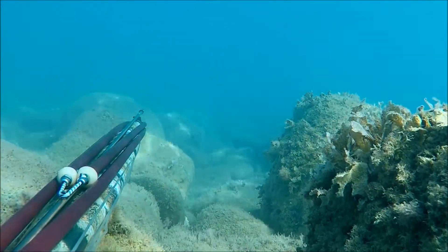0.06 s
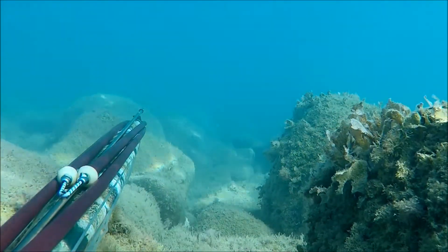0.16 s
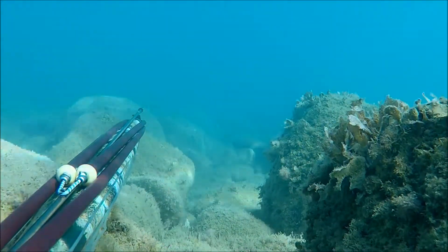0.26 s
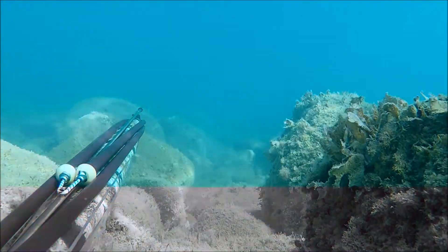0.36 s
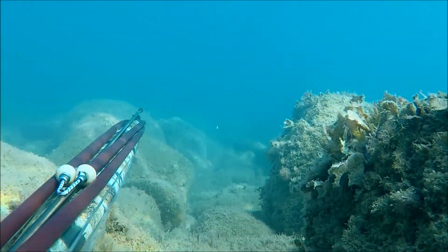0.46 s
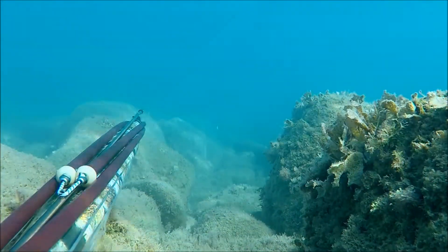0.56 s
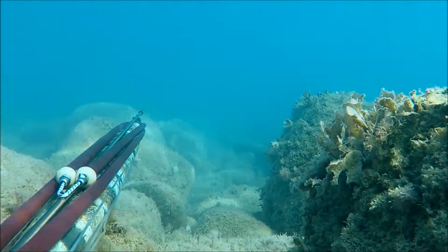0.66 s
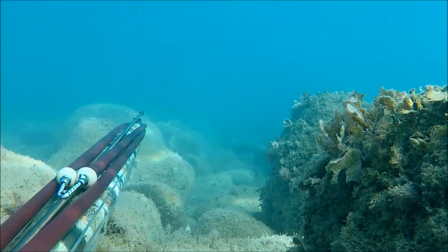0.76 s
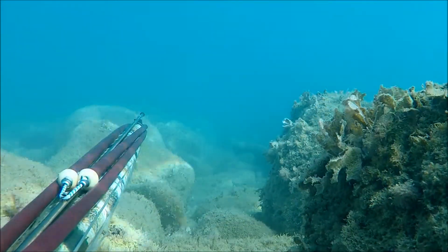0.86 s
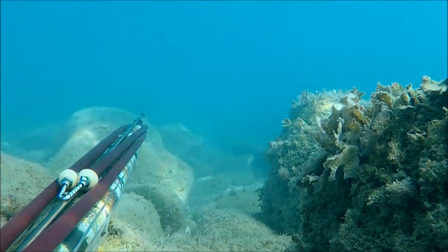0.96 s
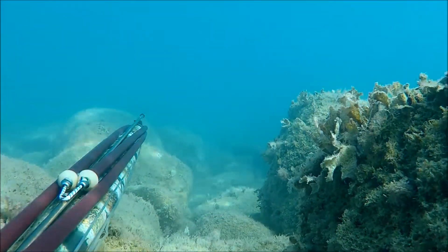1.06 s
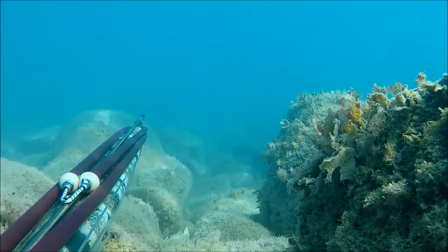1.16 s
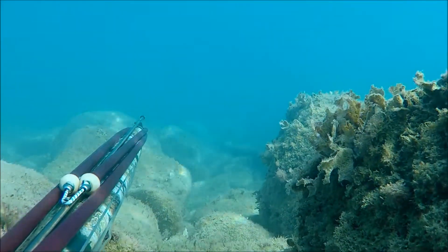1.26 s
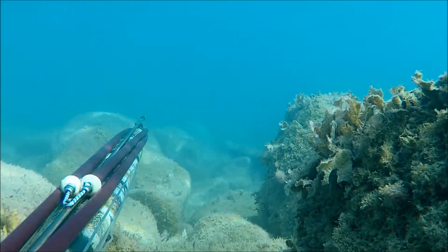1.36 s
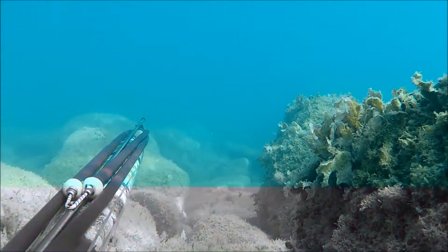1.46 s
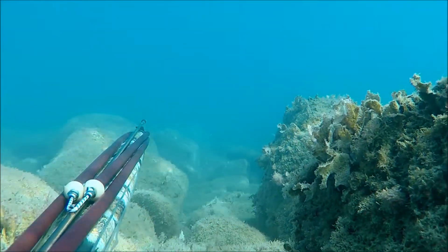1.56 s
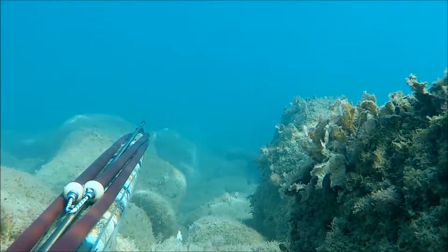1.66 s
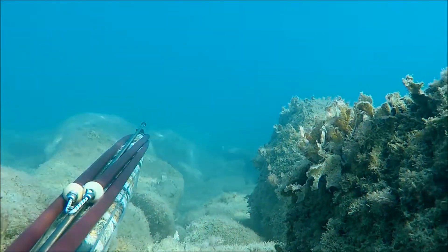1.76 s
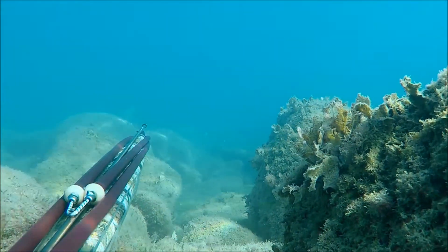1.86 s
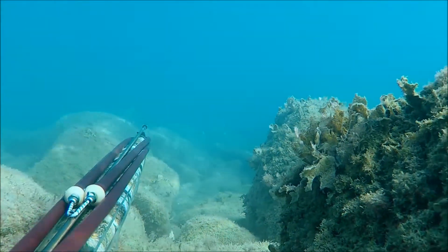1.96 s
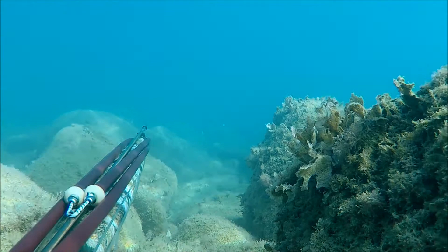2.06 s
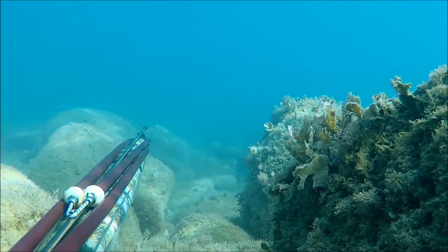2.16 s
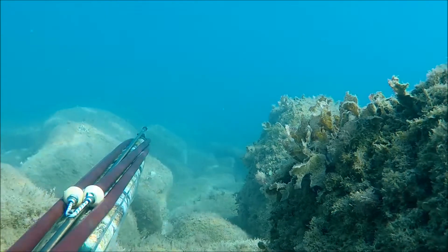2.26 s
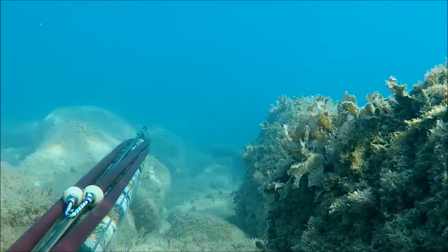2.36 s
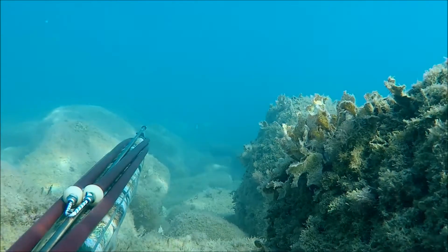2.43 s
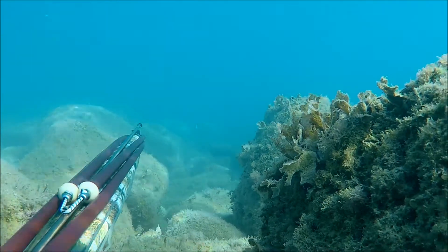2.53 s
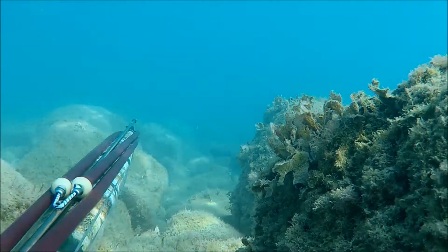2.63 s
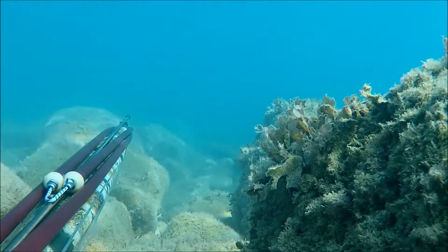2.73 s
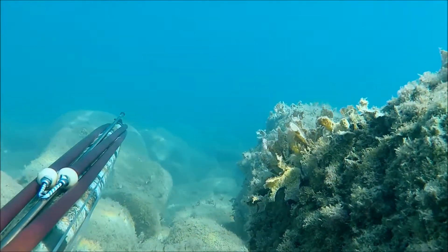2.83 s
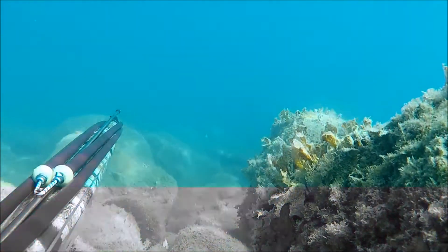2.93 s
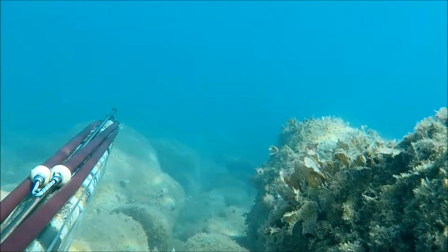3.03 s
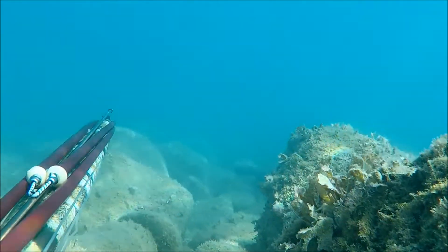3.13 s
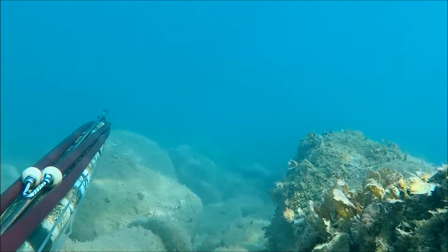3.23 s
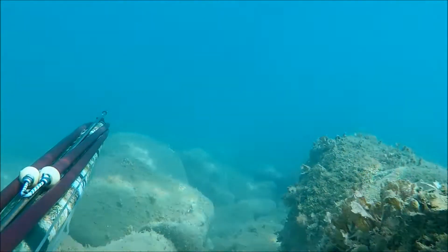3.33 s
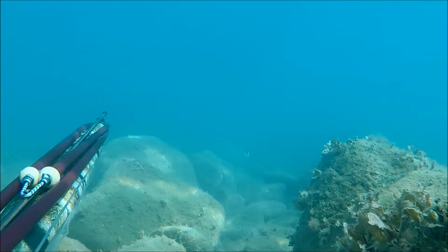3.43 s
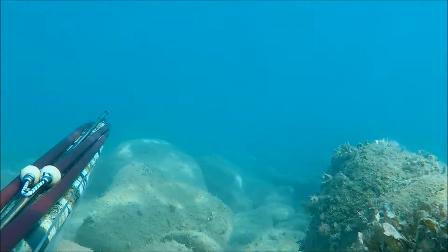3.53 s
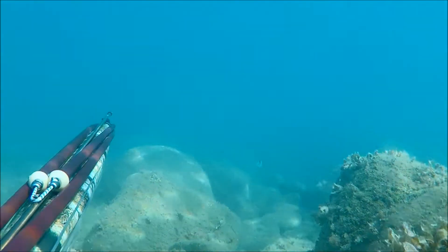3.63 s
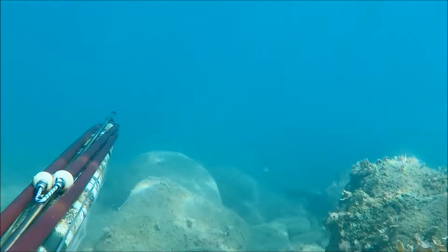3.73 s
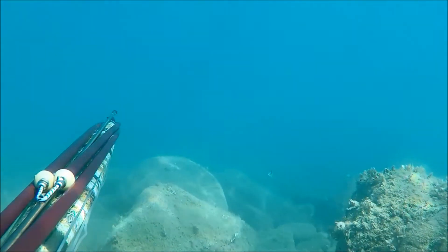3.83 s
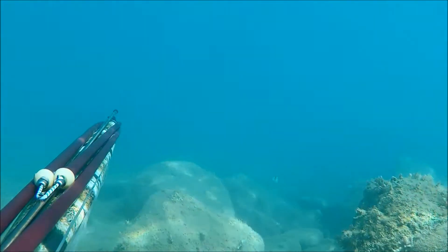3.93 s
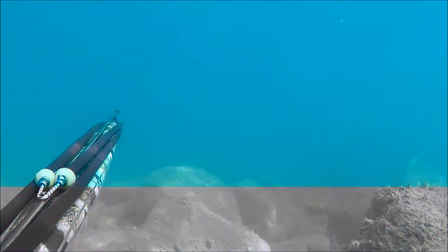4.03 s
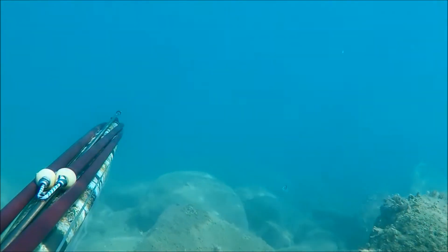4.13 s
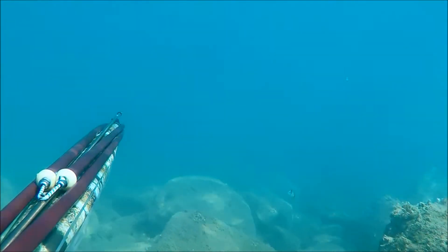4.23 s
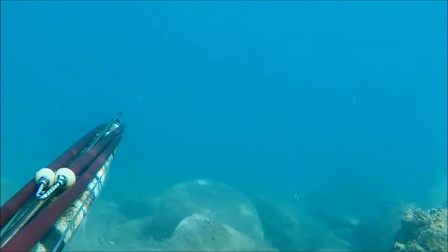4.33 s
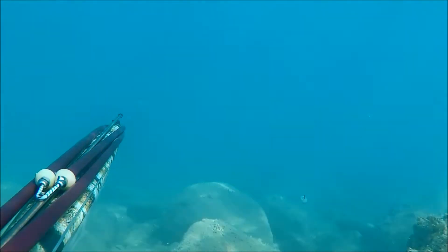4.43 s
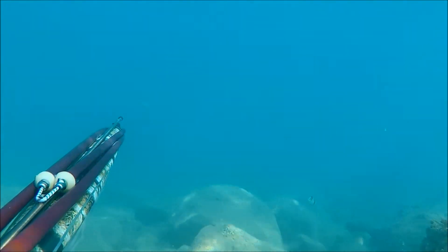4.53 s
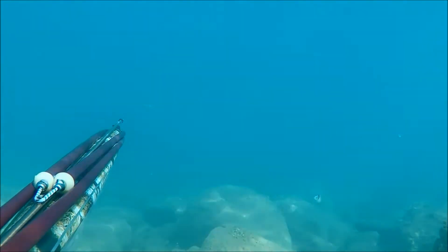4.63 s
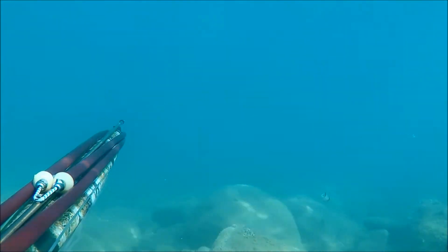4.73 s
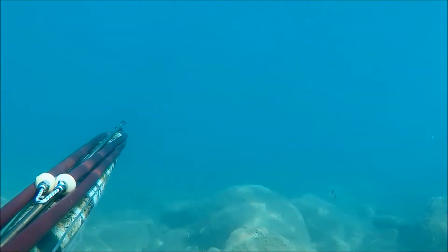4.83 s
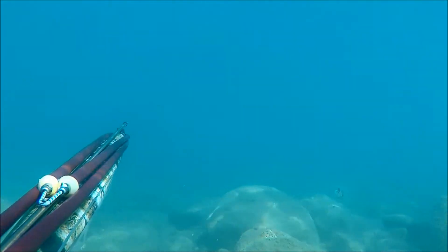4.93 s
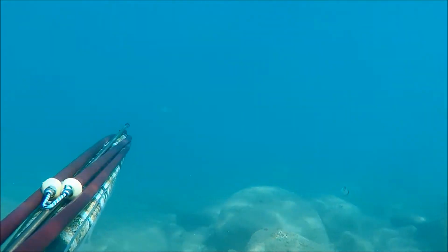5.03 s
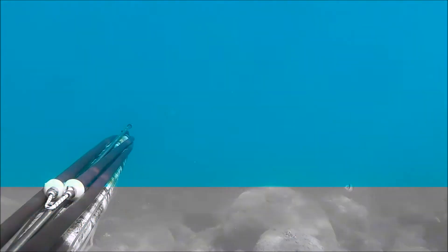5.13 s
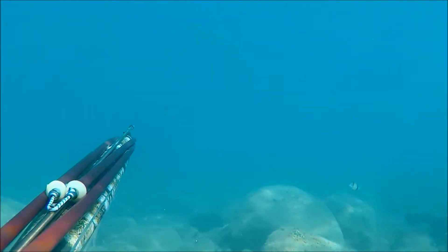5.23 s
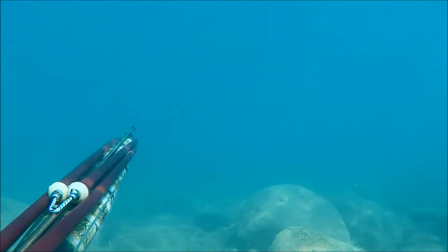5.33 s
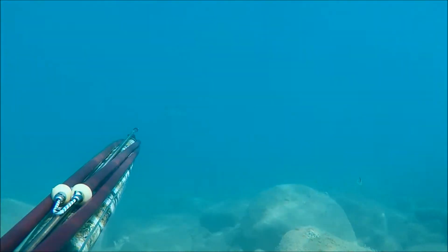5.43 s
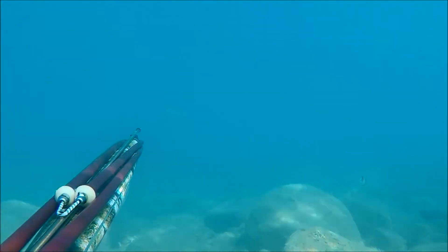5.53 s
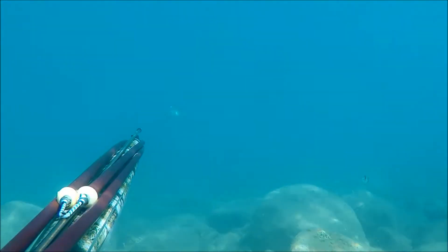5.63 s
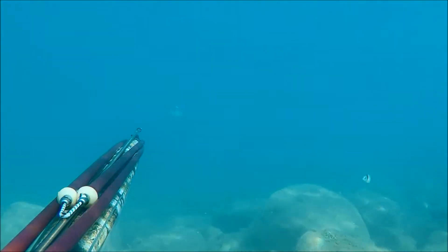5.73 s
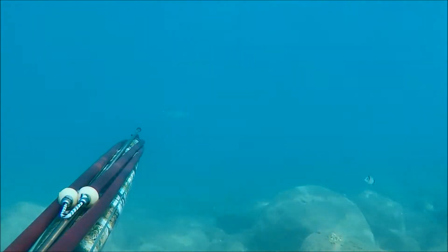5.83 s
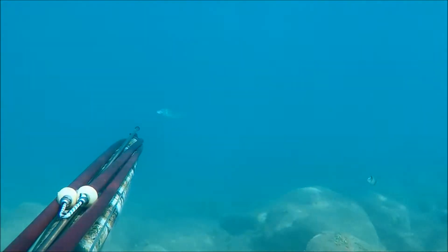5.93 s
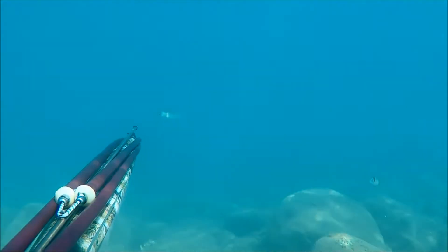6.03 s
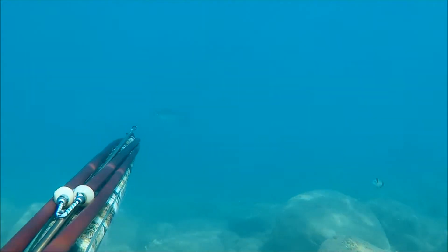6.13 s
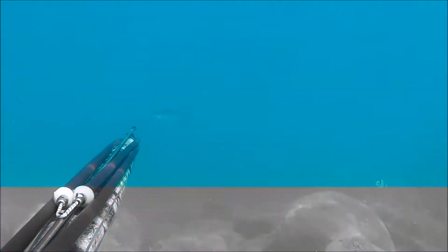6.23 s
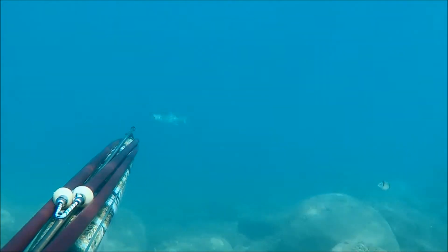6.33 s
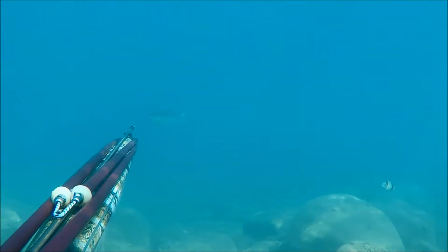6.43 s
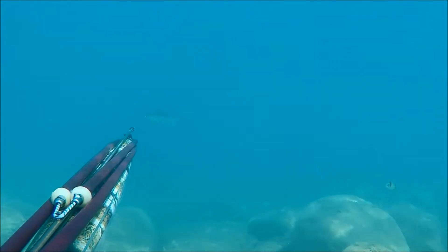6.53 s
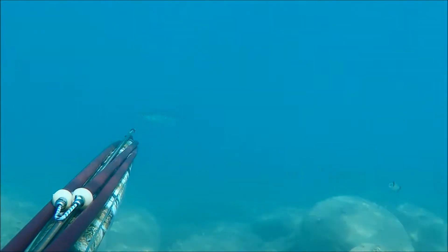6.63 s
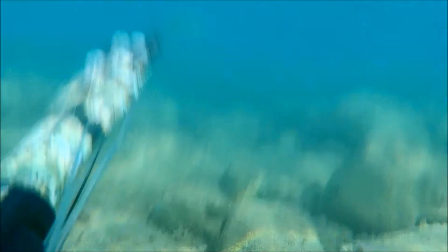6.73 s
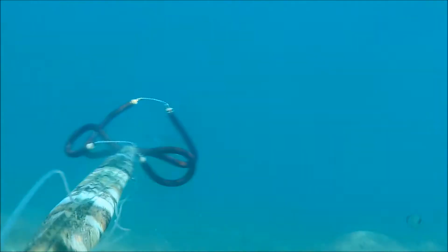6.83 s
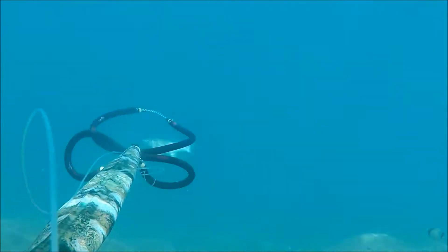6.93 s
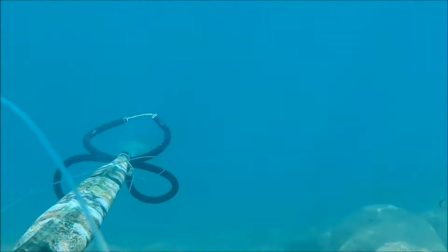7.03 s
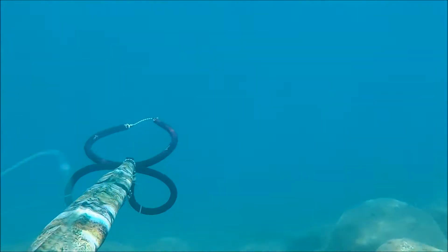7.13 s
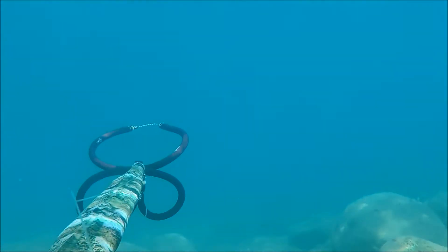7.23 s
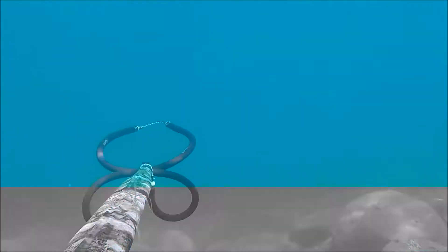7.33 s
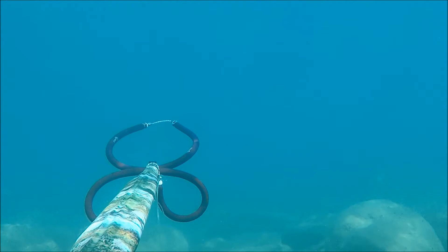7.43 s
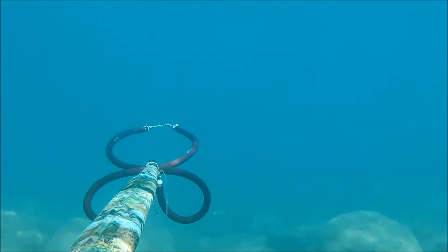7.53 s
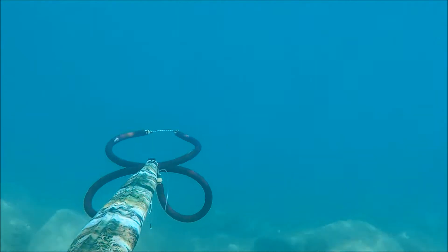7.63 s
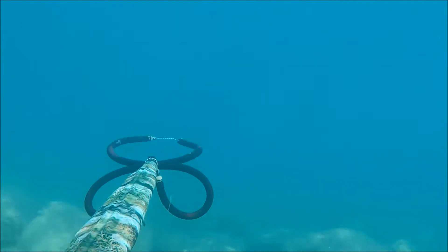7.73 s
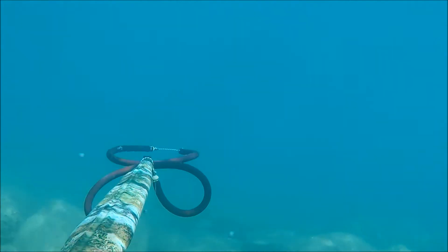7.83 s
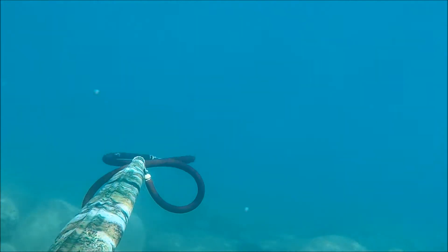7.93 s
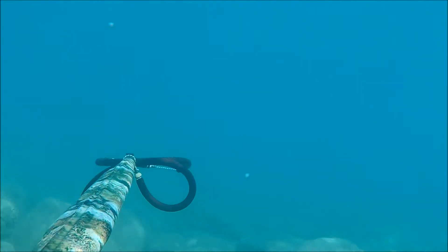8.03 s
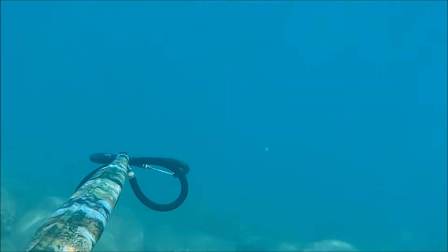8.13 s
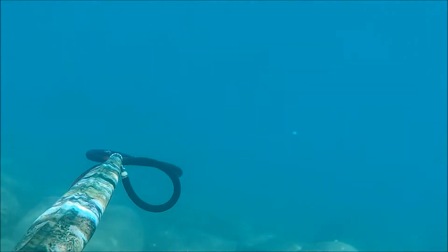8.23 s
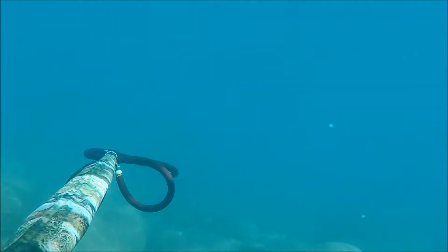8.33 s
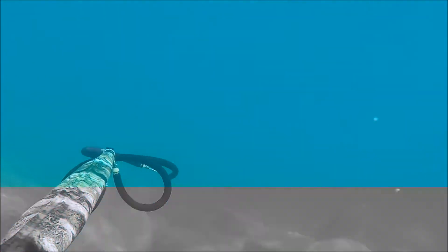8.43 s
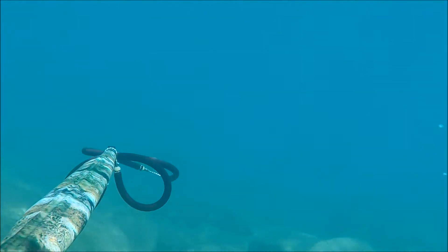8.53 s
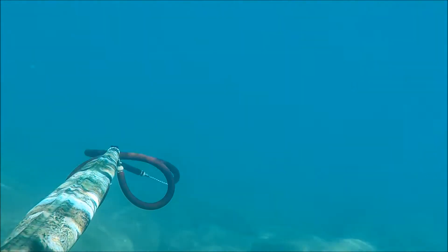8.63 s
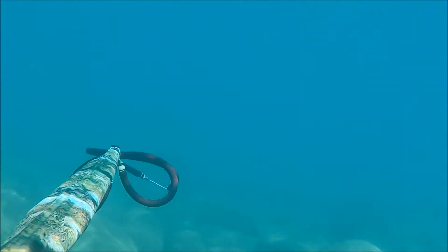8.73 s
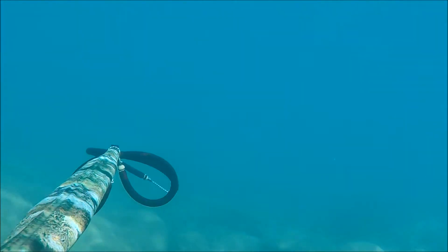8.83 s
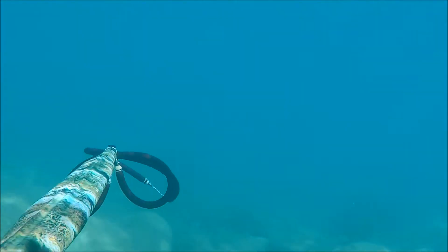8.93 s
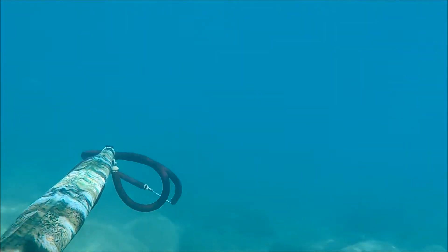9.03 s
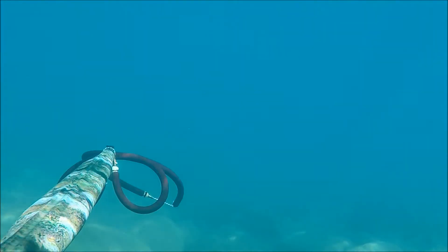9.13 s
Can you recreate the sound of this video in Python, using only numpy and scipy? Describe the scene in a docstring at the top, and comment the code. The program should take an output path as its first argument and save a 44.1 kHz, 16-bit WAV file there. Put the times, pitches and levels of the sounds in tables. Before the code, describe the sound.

A close, muffled contact sound on a gun gliding over a shallow reef. Shrimp snap and fizz continuously over uneven low buffeting while hand and rigging knock and tick. One rough burst of blows briefly ducks the background, and the stereo narrows and reopens. Then comes the loud shot, metallic and abrupt, with clinks and whipping line, a hush, and faint crackle returning in mono.

```python
"""A spearfisher glides over a reef, heard from inside a camera housing on the speargun.
From the start shaped noise buffets the housing, random grains of noise make rubbing and shrimp crackle,
and resonant contacts make groans, knocks, twangs and ticks; scrapes and rubber creaks follow from 2 s.
Near 3.7 s hard jolts swing the gun and the background dips; near 4.1 s the stereo image first narrows.
Near 6.8 s the gun fires, steel rings and line rattles; the background sinks, then creeps back, going mono."""
import sys
import numpy as np
from scipy import signal
from scipy.fft import rfft, irfft, next_fast_len
from scipy.io import wavfile
from scipy.ndimage import uniform_filter1d, map_coordinates

SR = 44100
rng = np.random.default_rng(int(sys.argv[2]) if len(sys.argv) > 2 else 0)


def master_out(mix):
    """Clip the mix to full scale and print it as 16-bit PCM to the path in sys.argv[1]."""
    frames = np.transpose(np.atleast_2d(mix))
    ceiling = np.clip(frames, -1, 1)
    pcm = np.round(ceiling * 32767).astype(np.int16)
    wavfile.write(sys.argv[1], SR, pcm)


N = 404397


def amp(db):
    """Decibel law: a level in dB becomes an amplitude ratio."""
    return 10 ** (np.asarray(db) / 20)


def unit(x):
    """Normalisation: each channel at rms 1."""
    return x / np.sqrt(np.mean(x ** 2, axis=-1, keepdims=True) + 1e-20)


def envelope(x, size):
    """Short-time rms over size samples."""
    return np.sqrt(np.abs(uniform_filter1d(x ** 2, size=size, axis=-1)))


def along(points, hz):
    """Logarithmic frequency scale: interpolate (f/Hz, value) points on it."""
    f, v = np.transpose(points)
    return np.interp(np.log(hz + 1), np.log(f + 1), v)


def curves(rows):
    """Linear interpolation: one value per sample for each column after the time."""
    s, *cols = np.transpose(rows)
    return [np.interp(np.arange(N) / SR, s, c) for c in cols]


def filtered(x, response):
    """Linear filtering: the spectrum of x times a complex response of frequency."""
    n = x.shape[-1]
    m = next_fast_len(n + 2048, real=True)
    spectrum = rfft(x, m) * response(np.fft.rfftfreq(m, 1 / SR))
    return irfft(spectrum, m)[..., :n]


def resonances(modes, f):
    """Modal superposition: causal resonances (f/Hz, width/Hz, level/dB) summed with alternating sign."""
    return sum((-1) ** k * amp(db) * 1j * f * w / (c * c - f * f + 1j * f * w)
               for k, (c, w, db) in enumerate(modes))


def band(f, hz, q):
    """Simple resonance: a causal band-pass of quality q."""
    return resonances([(hz, hz / q, 0)], f)


def soft(f, hz):
    """Contact compliance as a causal low-pass: a padded contact carries little treble."""
    return 1 / (1 + 1j * np.sqrt(2) * f / hz - (f / hz) ** 2)


def causal(points, f):
    """Minimum phase: a folded cepstrum gives a causal response with the gain of (f/Hz, level/dB) points."""
    cepstrum = irfft(np.log(amp(along(points, f)) + 1e-6))
    half = len(cepstrum) // 2
    return np.exp(rfft(np.r_[cepstrum[0], 2 * cepstrum[1:half], np.zeros(half)]))


TOP_HZ = 15150  # band limit


def tint(f, depth_db, count=40):
    """Path dependence: every place and path stresses other frequencies, drawn at random."""
    return causal(np.c_[np.geomspace(100, TOP_HZ, count), depth_db * rng.standard_normal(count)], f)


def wobble(rate):
    """Slow random modulation: a smooth curve through rate random knots a second."""
    return map_coordinates(rng.standard_normal(400), [np.arange(N) * rate / SR], mode="mirror")


def stroke(s, length, db, attack, release_db_per_s):
    """Attack and decay: a gain that reaches db at time s, holds for length and dies away."""
    t = np.arange(N) / SR - s
    return np.clip(1 + t / attack, 0, 1) * amp(db - release_db_per_s * np.maximum(t - length, 0))


def patter(rate, spread_db, t60, haze):
    """Shot noise: rate random grains a second of uneven size, over a steady share (haze)."""
    chance = rng.random((int(rate * N / SR), 2))
    size = amp(spread_db * np.minimum(-np.log(1 - chance[:, 1]), 3))
    power = np.bincount((chance[:, 0] * N).astype(int), size ** 2, N)
    decay = amp(-60 * np.arange(SR // 8) / SR / t60) ** 2
    power = np.abs(signal.fftconvolve(power, decay)[:N])
    return rng.standard_normal((2, N)) * np.sqrt(haze + power / power.mean())  # mid and side


def burst(t60, tail_db, tail_t60):
    """Double decay: mid and side noise dies quickly, then weak scatter from the rocks."""
    t = np.arange(SR // 5) / SR
    return rng.standard_normal((2, len(t))) * (amp(-60 * t / t60) + amp(tail_db - 60 * t / tail_t60))


def blow(scuff, t60, tail_db, tail_t60):
    """Impulsive excitation: one push followed by a short noisy scuff."""
    force = scuff * burst(t60, tail_db, tail_t60)
    force[:, 0] += rng.choice([-1, 1], 2)
    return force


def add(track, s, db, sound):
    """Superposition: add a mid and side sound at time s, its greatest 3 ms rms at db."""
    top = envelope(sound, size=130).max(axis=-1, keepdims=True)
    part = track[:, round(s * SR):][:, :sound.shape[1]]
    part += (amp(db) * sound / top)[:, :part.shape[1]]


# The background sinks away and creeps back: start t/s, fall time/s, depth/dB, hold time/s
BACKGROUND_DIPS = [(3.653, 0.054, 11.5, 0.026), (6.772, 0.29, 29, 0.63)]
RECOVER_DB_PER_S = 15


def dip_db():
    """Level envelope: the background falls, stays down, then climbs back at a steady rate."""
    t = np.arange(N) / SR
    sunk = 0
    for s, fall, depth, hold in BACKGROUND_DIPS:
        recovery = depth - RECOVER_DB_PER_S * (t - s - fall - hold)
        sunk = sunk + np.clip(np.minimum(depth * (t - s) / fall, recovery), 0, depth)
    return -sunk


# The stereo image closes to mono twice: t/s, side gain/dB
STEREO_WIDTH = [(0, 1.5), (3.85, 2.5), (4.1, -7), (4.55, -22), (4.8, -41), (5.3, -56), (5.45, -14.5),
                (5.8, -3.5), (6.5, 1.5), (7.1, 0), (7.85, -22), (8.15, -50), (9.17, -62)]


def narrowness():
    """Mid-side stereo: 0 with the side at full gain or above, near 1 for mono."""
    return 1 - np.minimum(amp(curves(STEREO_WIDTH)[0]), 1)


# Speed of the water past the housing, as the level of its buffeting: t/s, level/dB
WATER_FLOW = [(0, -36), (1.4, -40), (1.7, -48), (2.35, -55.5), (2.55, -43.5), (3.1, -29.5), (3.3, -32.5),
              (3.6, -31.5), (3.78, -16.5), (4.05, -43), (4.35, -33.5), (5.0, -30), (5.7, -29.5),
              (6.55, -29.5), (6.85, -16), (7.05, -32), (7.38, -55), (7.88, -63.5), (8.12, -38), (8.8, -36),
              (9.17, -30.5)]
# Single large eddies: t/s, rise over the flow level/dB
LARGE_EDDIES = [(0.05, 12.5), (0.59, 1), (0.76, 5.5), (1.38, 12), (3.04, 3), (3.29, 15), (3.4, 8.5),
                (3.5, 8), (4.36, 10), (5.899, 2.5), (6.64, 3.5), (7.131, 9), (8.1, 0.5)]
# Spectrum of the buffeting: f/Hz, relative level/dB
BUFFETING_SPECTRUM = [(8.8, -32.5), (15, 7), (32, -11.5), (55, -2), (190, -29), (250, -40), (420, -120)]
EDDY_S = 0.035  # half length of a large eddy, to 1/e of its rise in dB


def buffeting():
    """Turbulent pressure: eddies shed from the housing press on it slowly; now and then a large one passes."""
    t = np.arange(N) / SR
    eddies = filtered(rng.standard_normal((2, N)), lambda f: amp(along(BUFFETING_SPECTRUM, f)))
    steady = eddies / (envelope(eddies, size=5000) + 1e-10)
    large_db = sum(db * np.exp(-((t - s) / EDDY_S) ** 2) for s, db in LARGE_EDDIES)
    return amp(curves(WATER_FLOW)[0] + large_db + 2.2 * wobble(rate=13)) * steady


# Resonances of gun and housing: f/Hz, width/Hz, relative level/dB
HOUSING_MODES = [(114, 55, 0), (178.7, 51.7, 3), (281.3, 29, 1.5), (329.7, 21, 2.5), (403, 100, -6.5)]
# Resonances of the housing's shell: f/Hz, width/Hz, relative level/dB
SHELL_MODES = [(509, 55, -4.5), (588, 91, -1), (660.5, 166, -5.5), (762, 92, -10), (870, 8.1, -14.5)]
# Higher resonances of the gun: f/Hz, width/Hz, relative level/dB
UPPER_GUN_MODES = [(852, 100, 1), (1105, 75, 3.5), (1470, 336, 1), (1566, 66, 5), (1666, 62, -7),
                   (1878, 140, -1), (2050, 17, -1.5), (2350, 790, -6.5), (2880, 34, -10.5), (3072, 45, -4),
                   (3240, 2600, -13)]
# The hand shifts its hold and rubs harder: t of full rise/s, hold time/s, rise/dB
HAND_SHIFTS = [(0.767, 0.24, 6), (2.544, 0.8, 4.5), (4.827, 0.5, 4), (6.539, 0.63, 0.5),
               (7.995, 0.54, 12.5)]
SHIFT_RAMP_S = 0.1
# Nearness of the rock where the shrimp live, as the level of their crackle: t/s, level/dB
REEF_NEARNESS = [(0, -62.5), (1.1, -59.5), (2.7, -59), (3.1, -57), (3.6, -58.5), (4.2, -65), (4.7, -62),
                 (5.8, -65.5), (6.7, -63)]
RUB_DB, RUB_DIP_SHARE = -51.5, 0.77  # level of the resting hand; share of a dip
RUSTLE_DB, RUSTLE_PER_REEF, RUSTLE_DIP_SHARE = -56.5, 0.88, 0.79  # level; dB per dB of crackle; share of a dip


def rubbing():
    """Forced resonance: small slips of the glove rub the gun; grains of shrimp crackle excite a rustle."""
    t = np.arange(N) / SR
    glove_slips = patter(rate=60, spread_db=3.2, t60=0.05, haze=0.4)
    rub = filtered(glove_slips, lambda f: resonances(HOUSING_MODES + SHELL_MODES, f) * band(f, hz=347, q=0.14))
    crackle_grains = patter(rate=98, spread_db=5.0, t60=0.19, haze=0.077)
    rustle = filtered(crackle_grains, lambda f: resonances(UPPER_GUN_MODES, f) * band(f, hz=1500, q=0.59))
    shift_db = sum(db * np.clip(1 + np.minimum(t - s, s + length - t) / SHIFT_RAMP_S, 0, 1)
                   for s, length, db in HAND_SHIFTS)
    reef_db, sunk_db = curves(REEF_NEARNESS)[0], dip_db()
    rub_db = RUB_DB + shift_db + RUB_DIP_SHARE * sunk_db
    # the rustle follows the level of the reef
    rustle_db = RUSTLE_DB + RUSTLE_PER_REEF * (reef_db - reef_db.mean()) + RUSTLE_DIP_SHARE * sunk_db
    return amp(rub_db) * unit(rub) + amp(rustle_db) * unit(rustle)


# Spectrum of the snaps: f/Hz, relative level/dB
SNAP_SPECTRUM = [(1180, -35), (2000, 3), (2550, -6), (3180, -3), (3550, -11.5), (3920, -1), (4450, -8),
                 (5010, -0.5), (5400, -4.5), (5930, 0.5), (6390, -4), (6900, 1), (7380, -7), (13000, -25.5),
                 (15000, -43)]
# Spectrum of the far reef's fizz: f/Hz, relative level/dB
FIZZ_SPECTRUM = [(1180, -31.5), (2000, 2.5), (3200, -13.5), (3490, -9), (3890, -10), (5450, -2.5),
                 (5980, -3.5), (6500, -3.5), (9660, -5.5), (13000, -14.5), (14300, -23), (15000, -48)]
CLUMP_DB = 2.6  # the far snaps come in flurries
FIZZ_DB, MONO_LIFT_DB = -62, 0.5  # level outside dips; rise while the image is narrow


def far_shrimp():
    """Incoherent summation: flurries of grains, louder near the rock, over the fizz of countless snaps."""
    snaps = patter(rate=100, spread_db=5.6, t60=0.06, haze=0.15) * amp(CLUMP_DB * wobble(rate=16))
    grains = filtered(snaps, lambda f: amp(along(SNAP_SPECTRUM, f)) * band(f, hz=4830, q=0.93))
    fizz = filtered(rng.standard_normal((2, N)), lambda f: amp(along(FIZZ_SPECTRUM, f)))
    near = amp(curves(REEF_NEARNESS)[0]) * unit(grains)
    far = amp(FIZZ_DB + MONO_LIFT_DB * narrowness()) * unit(fizz)
    return amp(dip_db()) * (near + far)


# A glove dragging on the grip: t of full level/s, hold time/s, low groan level/dB, high groan level/dB
GRIP_DRAGS = [(0.0, 0.019, -31.5, -47), (0.091, 0.26, -40.5, -62), (8.057, 0.04, -46, -52),
              (8.24, 0.0725, -50.5, -54.5), (8.352, 0.073, -47.5, -59.5), (8.494, .1, -48.5, -59.5),
              (8.758, 0.16, -42, -63), (9.103, 0.07, -40.5, -53.5)]
# The glove squeaking: t of full level/s, hold time/s, level/dB
GLOVE_SQUEAKS = [(8.86, 0.095, -66)]
# The handle's groan, then its squeak: f/Hz, width/Hz, relative level/dB
GROAN_MODES = [(184, 11, 14), (597, 31, -2), (629, 30, -0.5), (670, 33, -6.5)]
SQUEAK_MODES = [(1815, 16, 0), (2730, 120, -24)]
DRAG_ATTACK_S, DRAG_RELEASE_DB_PER_S = 0.027, 118
GROAN_DRIFT = 0.03  # share by which the pressure of the hand bends the groan


def grip():
    """Friction-driven resonance: the dragging glove makes the handle groan at a wandering pitch, and squeak."""
    clock = np.cumsum(1 + GROAN_DRIFT * wobble(rate=14))

    def drags(rows):
        return sum(stroke(s, length, db, DRAG_ATTACK_S, DRAG_RELEASE_DB_PER_S) for s, length, db in rows)

    def bent(x):
        return unit(np.array([np.interp(clock % N, np.arange(N), channel) for channel in x]))

    def held(x):
        return x / (envelope(x, size=2500) + 1e-6)

    slips = patter(rate=92, spread_db=-3.5, t60=0.022, haze=1.0)
    low = held(bent(filtered(slips, lambda f: resonances(GROAN_MODES[:1], f) * band(f, hz=183.5, q=0.68))))
    high = held(bent(filtered(slips, lambda f: resonances(GROAN_MODES[1:], f) * band(f, hz=610, q=4.9))))
    waver = amp(1.5 * wobble(rate=12))
    rows = np.array(GRIP_DRAGS)
    groan = drags(rows[:, [0, 1, 2]]) * unit(low * waver) + drags(rows[:, [0, 1, 3]]) * high
    noise = rng.standard_normal((2, N))
    squeak = filtered(noise, lambda f: resonances(SQUEAK_MODES, f) * band(f, hz=1890, q=0.72))
    return groan + drags(GLOVE_SQUEAKS) * unit(squeak)


# Dull knocks of hand, bands and line on the gun:
# t/s, untrimmed thump level/dB, thump f/Hz, untrimmed shell ring level re thump/dB
GUN_KNOCKS = [(0.035, -16.5, 310, -6.5), (0.042, -20, 186, -15), (0.196, -35.5, 252, -3.5),
              (0.343, -41, 201, 3.5), (0.96, -48, 280, -2), (1.013, -55, 454, 29), (1.079, -44, 300, -2.5),
              (1.155, -33.5, 174, -11), (1.351, -28.5, 198, -7.5), (1.363, -26, 300, -9),
              (1.579, -33.5, 293, -5.5), (1.872, -41, 306, 2), (2.322, -60.5, 397, 25.5),
              (2.633, -40, 326, 0), (2.913, -19.5, 227, -19.5), (3.084, -22.5, 151.7, -29),
              (3.2667, -13, 137.6, -8.5), (3.282, -19.5, 170, -13.5), (3.318, -23.5, 193.5, -7.5),
              (3.363, -26, 207.2, -2), (3.389, -27, 197.2, -19), (3.481, -26.5, 187.6, -8),
              (3.663, -23.5, 280, -1.5), (3.669, -17.5, 233.6, -11), (3.686, -18, 197.8, -29),
              (3.7103, -18.5, 303, 1), (3.722, -12.5, 302, -19), (3.74, -16, 274, -9.5),
              (3.763, -16.5, 177, -17), (3.781, -11, 160, -7.5), (3.807, -20, 260, -6.5),
              (3.818, -19.5, 169.7, -16), (3.914, -40, 198.1, -5), (4.422, -27.5, 145.7, -6.5),
              (4.829, -23.5, 170, -5.5), (4.865, -27.5, 145, -4.5), (4.906, -35, 148, 1),
              (5.074, -35.5, 149, 9.5), (5.334, -24, 132.4, -5), (5.452, -53.5, 172, 23),
              (5.864, -32.5, 152.2, -6), (6.086, -31.5, 200.5, -12), (6.279, -41.5, 143.7, -2),
              (6.466, -35.5, 142.7, -5.5), (6.537, -31.5, 199, -3), (6.582, -36, 180, -1),
              (6.608, -29.5, 194.5, -12.5), (6.637, -39, 180, 3), (6.694, -34, 183, -7),
              (6.781, -15.5, 150, -9), (6.812, -7.5, 257, -5.5), (6.8335, -16, 292, 4),
              (6.873, -10.5, 156.2, -14), (6.896, -20, 284, -1.5), (6.923, -16, 155, -3.5),
              (6.934, -27.5, 302, 0), (6.945, -17.5, 171, -6), (6.98, -33.5, 169, -1),
              (7.016, -28.5, 296, -2.5), (7.093, -25.5, 244, -4.5), (7.193, -35, 299, -21),
              (7.228, -40.5, 300, -18), (7.5365, -44, 301, -7), (7.986, -44, 300, -4),
              (8.055, -48, 250, -6), (8.078, -27.5, 163, -27.5), (9.019, -26.5, 158.8, -26.5)]


def knocks():
    """Impact excitation: a blow thumps the housing at a pitch set by the contact, and rings its shell."""
    out = np.zeros((2, N))
    for s, db, hz, shell_db in GUN_KNOCKS:
        force = blow(scuff=0.051, t60=0.054, tail_db=-18.5, tail_t60=0.33)

        def thump(f):
            body = resonances(HOUSING_MODES, f) + 0.25 * band(f, hz=285, q=0.14)
            return body * band(f, hz, q=2.3) * soft(f, hz=776)

        def shell(f):
            body = resonances(SHELL_MODES, f) + 0.094 * band(f, hz=650, q=1.0)
            return body * band(f, hz=645, q=0.91) * soft(f, hz=1300) * tint(f, depth_db=5.5)

        add(out, s, db - 4.0, filtered(force, thump))
        add(out, s, db + shell_db - 6.0, filtered(force, shell))
    return out


# The rubber bands twanging: t/s, f/Hz, untrimmed level/dB, t60/s, attack time constant/s
BAND_TWANGS = [(0.035, 425, -23, 0.051, 0.0028), (0.044, 674, -25, 0.063, 0.0019),
               (2.831, 335, -19, 0.022, .006), (7.098, 615, -28, 0.046, .01),
               (7.109, 596, -29, 0.043, 0.0078), (7.23, 660, -44, 0.047, 0.0033),
               (8.074, 615, -31, 0.053, .002), (8.077, 174.7, -24.5, 0.24, 0.0033),
               (8.935, 564, -41, 0.038, 0.018)]


def twangs():
    """Damped free vibration: a plucked band rings at one pitch, quickly damped by the water."""
    out, t = np.zeros((2, N)), np.arange(SR // 3) / SR
    for s, hz, db, t60, attack in BAND_TWANGS:
        swing = np.sin(2 * np.pi * (hz * t + rng.random((2, 1))))
        add(out, s, db - 4.0, swing * (1 - np.exp(-t / attack)) * amp(-60 * t / t60))
    return out


# Hard ticks of the rigging: t/s, untrimmed level/dB, centre f/Hz, untrimmed dry click level re ring/dB
RIGGING_TICKS = [(0.0359, -31, 1110, -18), (0.1937, -28.5, 1470, -31), (0.464, -39, 1300, -6),
                 (0.609, -39, 1420, -21), (1.018, -35, 960, -11), (1.074, -32, 1150, -11),
                 (1.1613, -30, 1130, -10), (1.356, -27.5, 1140, -18), (2.141, -33.5, 1160, -4.5),
                 (3.267, -28, 990, -6.5), (3.283, -34, 1100, -20), (3.319, -40.5, 1010, -12),
                 (3.3645, -19.5, 1420, -26), (3.372, -24, 1480, -26), (3.6618, -17, 1470, -18),
                 (3.666, -9, 1400, -16.5), (3.7205, -30, 1090, -5), (3.739, -33.5, 1000, -5),
                 (3.78, -29, 1140, 4.5), (3.818, -30.5, 1120, -18), (3.9129, -26.5, 1470, -9.5),
                 (3.915, -35, 1300, -13), (4.1618, -33, 1470, -11), (5.0767, -26.5, 1800, -26),
                 (5.455, -30.5, 1360, -12), (6.284, -47, 1400, -14), (6.442, -45, 1400, -2),
                 (6.4762, -34.5, 1520, -9), (6.61, -39, 2020, -13), (6.69, -37, 1290, -12),
                 (6.784, -33, 1255, -6), (6.809, -20, 1650, -13), (6.8338, -11, 1680, -5),
                 (6.897, -29, 1430, -13.5), (6.924, -39, 1030, -14), (6.941, -38, 1600, -11),
                 (6.98, -26, 1700, -10), (7.0166, -39, 1700, -16.5), (7.034, -37, 2350, -2),
                 (7.0502, -29.5, 1310, -8), (7.0912, -33, 1820, -19), (7.106, -35.5, 1015, -8),
                 (7.113, -38, 1500, -10), (7.191, -44, 1200, -10), (7.197, -44, 1700, -6),
                 (7.2295, -37, 1650, -8), (7.234, -50, 1500, -1.5), (7.537, -43, 1410, -6),
                 (7.541, -45, 1250, -8), (7.876, -59.5, 1093, -9.5), (7.984, -55, 1200, -8.5),
                 (8.072, -47.5, 2700, -2), (8.078, -52, 1350, -14)]
# Spectrum of a dry click through the housing wall: f/Hz, relative level/dB
CLICK_SPECTRUM = [(200, -9), (700, 0.5), (1900, -3), (2300, -21.5), (3200, -16.5), (4000, -33),
                  (7000, -42.5), (15000, -73)]


def ticks():
    """Impact on a resonator: line and fittings tap the barrel, giving a dry click and a short ring."""
    out = np.zeros((2, N))
    for s, db, hz, click_db in RIGGING_TICKS:
        force = blow(scuff=0.12, t60=0.018, tail_db=-21, tail_t60=0.14)
        tap = blow(scuff=0.11, t60=0.005, tail_db=-30.0, tail_t60=0.05)

        def barrel(f):
            contact = band(f, hz, q=3.5) * tint(f, depth_db=2.5)
            return (resonances(UPPER_GUN_MODES, f) + band(f, hz, q=12.0)) * contact * soft(f, hz=1990)

        click = filtered(tap, lambda f: causal(CLICK_SPECTRUM, f) * tint(f, depth_db=7.0))
        add(out, s, db - 12.5, filtered(force, barrel))
        add(out, s, db + click_db, click)
    return out


# The nearest shrimp: t/s, untrimmed snap level/dB, untrimmed body level re snap/dB, centre f/Hz
NEAR_SNAPS = [(0.217, -26.5, 1.5, 4400), (0.4752, -32.5, 0, 6330), (0.511, -41, 8.5, 5000),
              (0.612, -41.5, 12, 4500), (0.762, -55.5, 20, 5000), (0.779, -39, 9, 6000),
              (0.8715, -40, 11, 3660), (1.0094, -30.5, 5, 5470), (1.0995, -24, 1.5, 4160),
              (1.248, -26, 5, 4370), (1.3562, -33.5, -5, 6000), (1.5579, -42, 5, 5000),
              (1.847, -40.5, -18, 5030), (1.6264, -37, 6, 3520), (1.648, -34.5, 10, 6500),
              (1.89, -41, -2, 6920), (1.945, -35, 7.5, 5000), (1.994, -37.5, 2, 5030),
              (2.026, -29, 2, 2850), (2.152, -32, 2, 4900), (2.184, -39.5, 15.5, 4930),
              (2.4749, -34.5, 7, 4870), (2.488, -33, 4, 5500), (2.5318, -32.5, 1, 5060),
              (2.592, -29.5, 6, 5040), (2.6367, -34.5, 9, 5000), (2.704, -33, -20, 6500),
              (2.7983, -34, -15, 5500), (2.841, -39, 11, 5300), (2.9309, -42.5, 12, 5000),
              (2.972, -31, 1.5, 6900), (3.0288, -38, 5, 5130), (3.098, -39.5, -13, 6000),
              (3.207, -38.5, 2, 5500), (3.371, -39, -13, 6500), (3.551, -37.5, 10, 5000),
              (3.569, -35.5, 8.5, 3900), (3.614, -40.5, 14, 4960), (3.6497, -29, -16, 5650),
              (3.693, -41.5, -8, 6000), (3.942, -45.5, -15, 8800), (4.075, -43.5, -11, 5800),
              (4.3885, -34, 1, 3500), (4.585, -28.5, -26, 5660), (4.724, -41, -16, 6000),
              (4.94, -35.5, -14, 3960), (5.1295, -32.5, 8.5, 9300), (5.186, -39.5, -31, 6040),
              (5.1968, -24, -23, 5200), (5.305, -37.5, -15, 6700), (5.604, -43, 10, 4500),
              (5.682, -36, -19, 6130), (5.923, -40, -2, 3800), (6.02, -39.5, -3, 6500),
              (6.045, -35, 6, 3740), (6.117, -41.5, -6, 7500), (6.1563, -38, 3, 5100),
              (6.434, -43.5, -3, 5040), (6.61, -46.5, 12, 5500), (6.7162, -37.5, -16.5, 3900),
              (8.113, -60, 8.5, 5600), (8.3389, -51.5, 4, 6000), (8.494, -52.5, -3, 5500),
              (9.11, -52.5, -11, 5000)]


def near_shrimp():
    """Cavitation: each claw collapses a bubble, a bright snap that also shakes the gun's resonances."""
    out = np.zeros((2, N))
    for s, db, body_db, hz in NEAR_SNAPS:
        snap = burst(t60=0.036, tail_db=-10, tail_t60=0.15)

        def bright(f):
            return causal(SNAP_SPECTRUM, f) * band(f, hz, q=1.5) * tint(f, depth_db=6.0)

        def body(f):
            return resonances(UPPER_GUN_MODES, f) * band(f, hz=2010, q=1.0) * tint(f, depth_db=6.0)

        add(out, s, db - 8.5, filtered(snap, bright))
        add(out, s, db + body_db - 17.0, filtered(snap, body))
    return out


# Colour of the reef while the image is mono: f/Hz, gain/dB
MONO_REEF_COLOUR = [(1500, -2), (2200, -2.5), (2700, 9), (3300, -5), (3800, 2), (4200, 3), (4700, 3),
                    (5300, -4.5), (5750, -1.5), (6120, 4), (6600, -5), (7500, -0.5), (9300, 3.5),
                    (11000, -1), (14000, 1.5)]


def reef():
    """Spectral coloration: as the image closes, all the crackle gains peaks near 2.7 and 6.1 kHz."""
    crackle = near_shrimp() + far_shrimp()
    narrow = narrowness()
    coloured = filtered(crackle, lambda f: causal(MONO_REEF_COLOUR, f))
    return (1 - narrow) * crackle + narrow * coloured


# Rigging and stock scraping along the gun: t of full level/s, hold time/s, barrel level/dB, housing level/dB
GUN_SCRAPES = [(1.937, 0.045, -54.5, -54), (2.011, 0.014, -53, -46.5), (2.131, 0.065, -44, -64),
               (3.695, .02, -55, -34), (3.729, 0.029, -50.5, -29), (3.819, 0.01, -50.5, -35.5),
               (5.06, .025, -52, -52), (6.617, 0.016, -52.5, -46.5), (6.787, 0.0095, -37, -31.5),
               (6.864, 0.0091, -45.5, -31.5), (6.932, 0.019, -53, -35.5), (7.119, 0.036, -66, -54.5),
               (7.218, 0.0062, -63, -48), (8.075, .015, -71.5, -51), (9.121, 0.059, -60.5, -46)]
SCRAPE_ATTACK_S, SCRAPE_RELEASE_DB_PER_S = 0.013, 254.5


def scrapes():
    """Stick-slip friction: tiny slips of cord and stock rasp on the barrel and grind through the housing."""
    slips = patter(rate=200, spread_db=2, t60=0.0099, haze=0.56)
    barrel = filtered(slips, lambda f: resonances(UPPER_GUN_MODES, f) * band(f, hz=1400, q=0.74))
    housing = filtered(slips, lambda f: resonances(HOUSING_MODES + SHELL_MODES, f) * band(f, hz=220, q=0.7))

    def drag(s, length, db):
        return stroke(s, length, db, SCRAPE_ATTACK_S, SCRAPE_RELEASE_DB_PER_S)

    barrel_gain = sum(drag(s, length, db) for s, length, db, _ in GUN_SCRAPES)
    housing_gain = sum(drag(s, length, db) for s, length, _, db in GUN_SCRAPES)
    return unit(barrel) * barrel_gain + unit(housing) * housing_gain


# Rubber creaking under the hand: start t/s, duration/s, first f/Hz, last f/Hz, level/dB
RUBBER_CREAKS = [(2.5, 0.075, 127, 192, -36), (2.58, 0.13, 164, 174, -41.5), (2.6, 0.19, 331.4, 372, -46),
                 (2.77, 0.058, 269, 260, -39.5), (2.925, .11, 173, 158, -38), (2.935, 0.098, 301, 365, -36)]
CREAK_ROUGH = 0.3  # unevenness of its slips


def creaks():
    """Frequency glide of stick-slip: rubber slips at a rate that follows the pull on it."""
    out, t = np.zeros((2, N)), np.arange(SR // 4) / SR
    for s, length, first_hz, last_hz, db in RUBBER_CREAKS:
        done = np.minimum(t / length, 1)
        phase = 2 * np.pi * np.cumsum(first_hz + (last_hz - first_hz) * done) / SR
        noise = rng.standard_normal((2, 2, len(t)))
        size, lag = CREAK_ROUGH * unit(filtered(noise, lambda f: soft(f, hz=59.1)))
        add(out, s, db, np.sin(np.pi * done) * (1 + size) * np.sin(phase + 2 * lag))
    return out


# Hard jolts rock the whole gun in the water: t/s, f/Hz, level/dB, t60/s
GUN_JOLTS = [(3.679, 62, -12, 0.048), (3.742, 96, -13, 0.073), (3.784, 69.8, -8.5, 0.32),
             (6.798, 51.3, -9.5, 0.19), (6.809, 95, -7, 0.061), (6.8345, 190, -12.5, 0.028),
             (6.839, 58.7, -5.5, 0.15), (6.923, 62, -12, 0.11)]


def jolts():
    """Damped oscillation: recoil and hard blows shove the whole gun, which swings back a few times."""
    out, t = np.zeros((2, N)), np.arange(SR // 3) / SR
    for s, hz, db, t60 in GUN_JOLTS:
        swing = np.sin(2 * np.pi * hz * t) * amp(-60 * t / t60)
        add(out, s, db, rng.choice([-1, 1], (2, 1)) * swing)
    return out


LINE_S, LINE_ATTACK_S = 6.79, 0.022  # start, time to full speed
WHIP_DB, WHIP_FALL_DB_PER_S = -30, 166  # first loops, torn off at once
RUN_DB, RUN_FALL_DB_PER_S = -51, 90  # the rest, slowed by the water


def line():
    """Repeated impact: line whipping off its holder rattles along the barrel and drums on the shell."""
    rattle = patter(rate=218.2, spread_db=2, t60=0.014, haze=0.6)
    level = sum(stroke(LINE_S + LINE_ATTACK_S, 0, db, LINE_ATTACK_S, fall)
                for db, fall in [(WHIP_DB, WHIP_FALL_DB_PER_S), (RUN_DB, RUN_FALL_DB_PER_S)])
    barrel = filtered(rattle, lambda f: resonances(UPPER_GUN_MODES, f) * band(f, hz=1600, q=0.8))

    def shell(f):
        return (band(f, hz=323, q=3.3) - band(f, hz=600, q=4.5)) * band(f, hz=480, q=1.0)

    return level * (unit(barrel) + unit(filtered(rattle, shell)))


# Steel on steel as the spear leaves: t/s, untrimmed crack level/dB, untrimmed ring level/dB, most stressed f/Hz
STEEL_CLASHES = [(6.793, -17.5, -42, 3900), (6.8006, -12, -48, 3000), (6.811, -16, -23, 1940),
                 (6.827, -28, -24.5, 1940), (6.8342, -5, -11, 1500), (6.8352, -9, -20, 2900),
                 (6.895, -22, -46, 1940), (6.901, -24, -46, 1940), (6.907, -25.5, -41, 3200),
                 (7.032, -42, -35, 2450), (7.035, -43, -36, 2480), (7.0498, -43, -37, 2500),
                 (7.051, -55, -40, 1300), (7.136, -53, -59.5, 3900), (7.159, -59, -67, 3000)]
# The spear's ring: f/Hz, relative level/dB, t60/s
SPEAR_MODES = [(1490, -12, 0.065), (1460, -10.5, .025), (1960, 5, .022), (2420, -3, 0.011),
               (2930, -2, 0.022), (3000, 1, 0.028), (3230, -12, 0.035), (3920, -15, 0.025),
               (5930, -21, 0.027)]
# Spectrum of a crack of steel through the housing wall: f/Hz, relative level/dB
CRACK_SPECTRUM = [(200, -19), (600, 13.5), (3000, -2), (4200, -26.5), (6500, -4), (8000, -15.5),
                  (11000, -29), (15000, -57)]
STRESS_DB_PER_OCTAVE = 14.5  # modes away from the stressed one ring less


def shot():
    """Modal ringing: the steel spear clashes through the muzzle and its fittings clink after it."""
    out, t = np.zeros((2, N)), np.arange(SR // 4) / SR
    for s, crack_db, ring_db, stressed_hz in STEEL_CLASHES:
        ring = np.zeros((2, len(t)))
        for hz, level, t60 in SPEAR_MODES:
            mode_db = level - STRESS_DB_PER_OCTAVE * abs(np.log2(hz / stressed_hz))
            ring += amp(mode_db - 60 * t / t60) * np.sin(2 * np.pi * (hz * t + rng.random((2, 1))))
        noise = burst(t60=0.02, tail_db=-30.0, tail_t60=0.11)
        crack = filtered(noise, lambda f: causal(CRACK_SPECTRUM, f) * tint(f, depth_db=4.5))
        add(out, s, ring_db - 6.0, ring * (1 - np.exp(-t / 0.0008)))
        add(out, s, crack_db - 14.0, crack)
    return out


# Sideways against common motion of the two microphones: f/Hz, side gain/dB
SIDEWAYS_MOTION = [(50, -8), (110, -12), (170, 0), (320, 5), (520, 3.5), (660, 9.5), (900, 13.5),
                   (1300, 10), (1750, -10), (2500, 6), (3800, -8.5), (5200, 2), (8000, -2), (14000, -3.5)]


def scene():
    """Mid-side superposition: the housing sways near 1 kHz, so the microphones move against each other."""
    gun = rubbing() + grip() + knocks() + twangs() + ticks() + scrapes() + creaks() + jolts() + line() + shot()
    mid, side = buffeting() + gun + reef()
    side = amp(curves(STEREO_WIDTH)[0]) * filtered(side, lambda f: causal(SIDEWAYS_MOTION, f))
    return np.array([mid + side, mid - side])


def record(dry):
    """Saturation and band limiting: the camera rounds off the loudest peaks and keeps nothing above TOP_HZ."""
    rounded = dry / (1 + np.abs(dry) ** 6) ** (1 / 6)
    return filtered(rounded, lambda f: f < TOP_HZ)


dry = scene()
out = record(dry)
master_out(out)
```